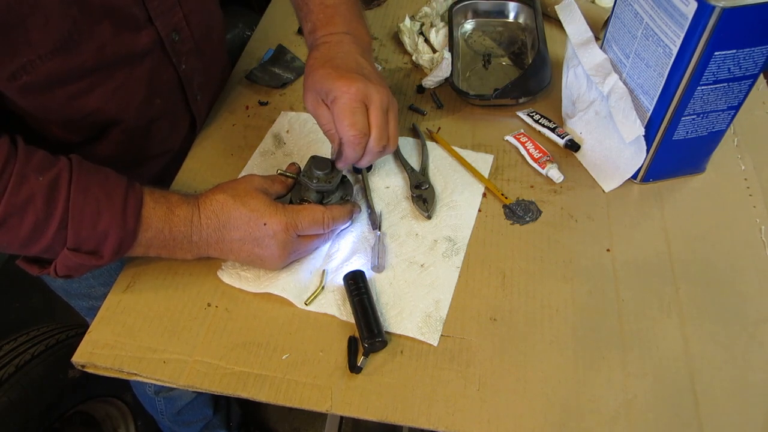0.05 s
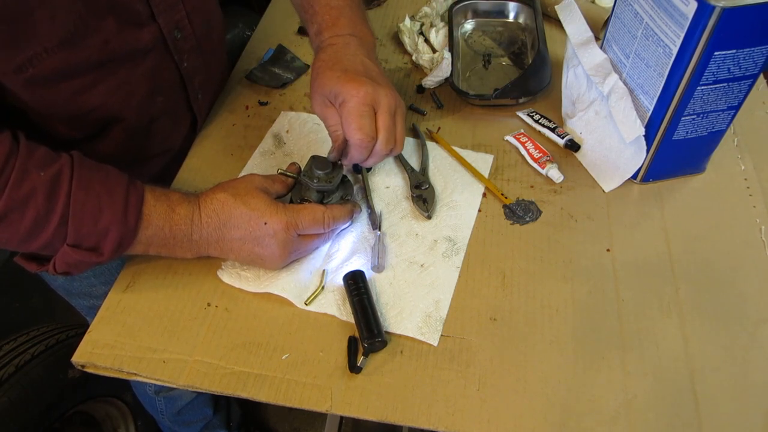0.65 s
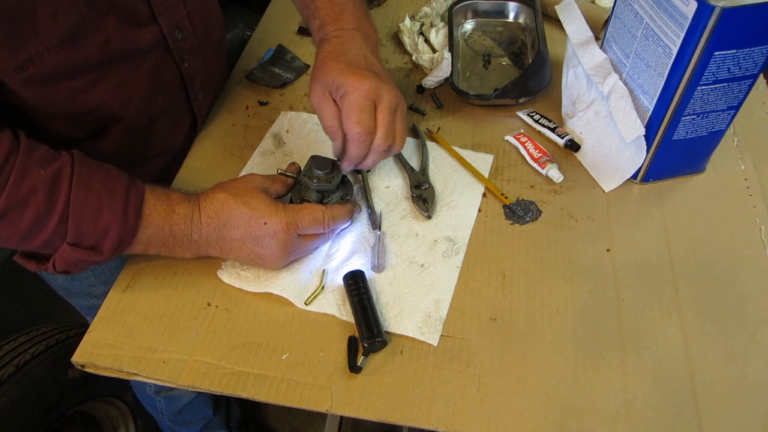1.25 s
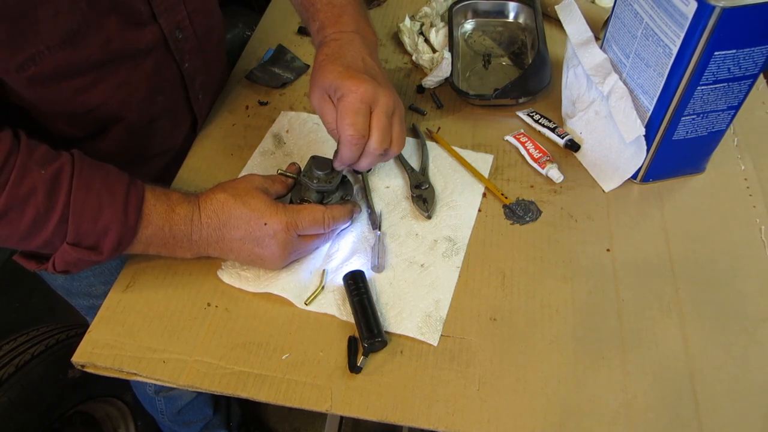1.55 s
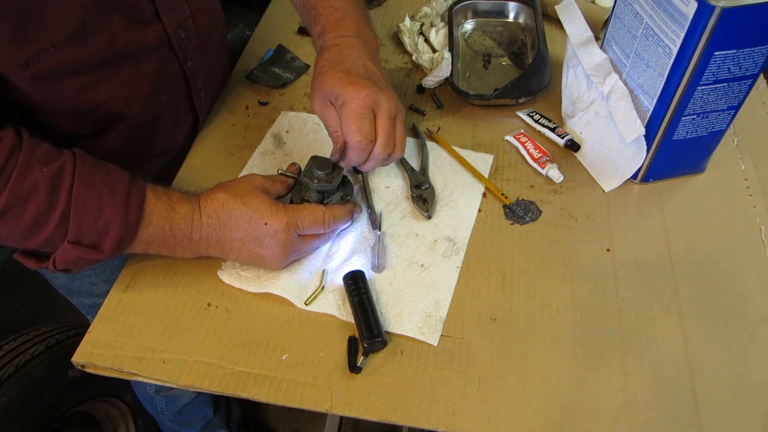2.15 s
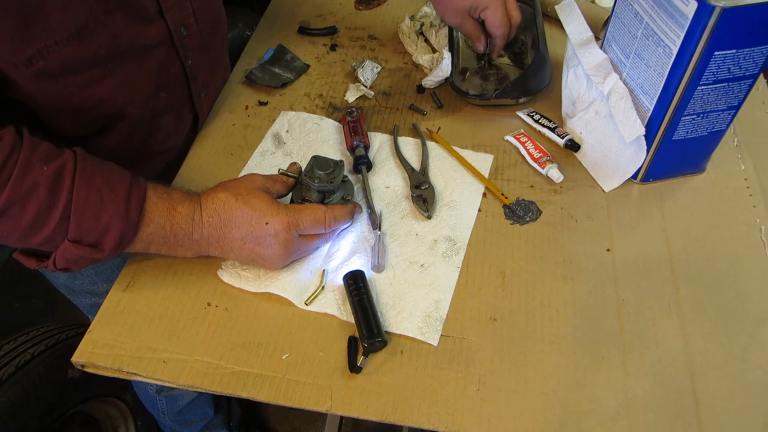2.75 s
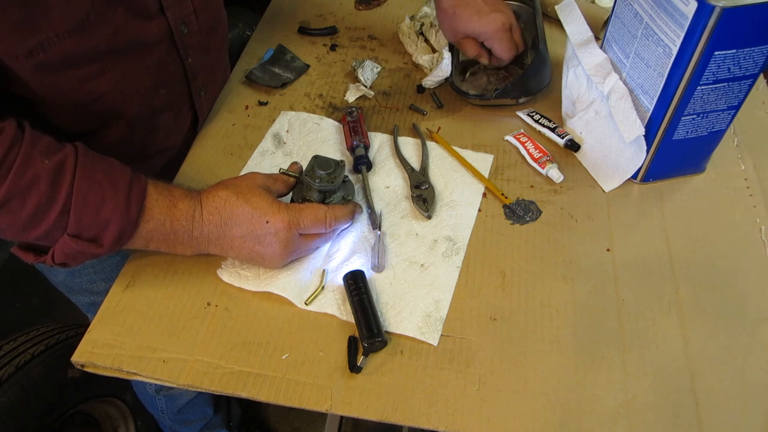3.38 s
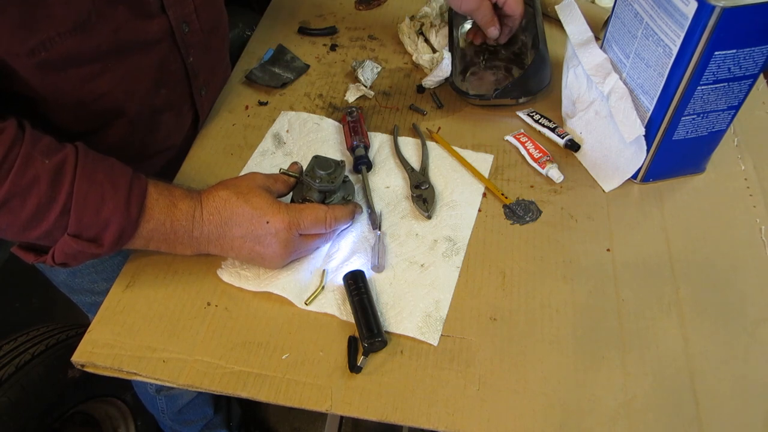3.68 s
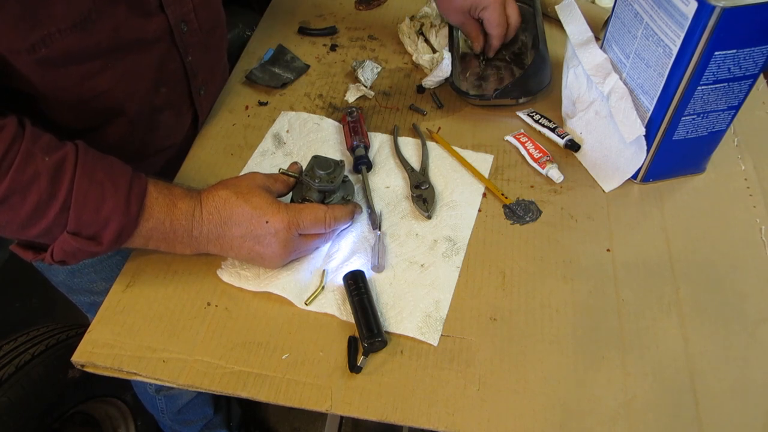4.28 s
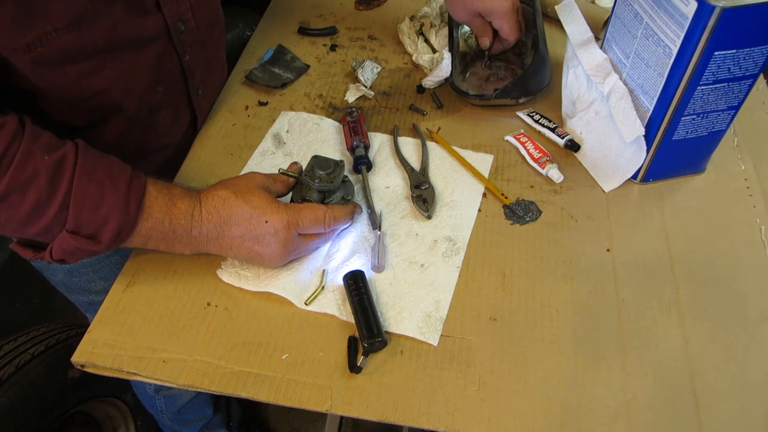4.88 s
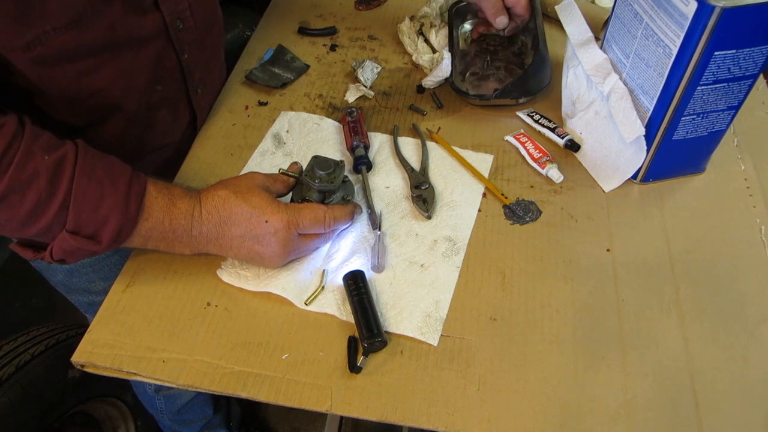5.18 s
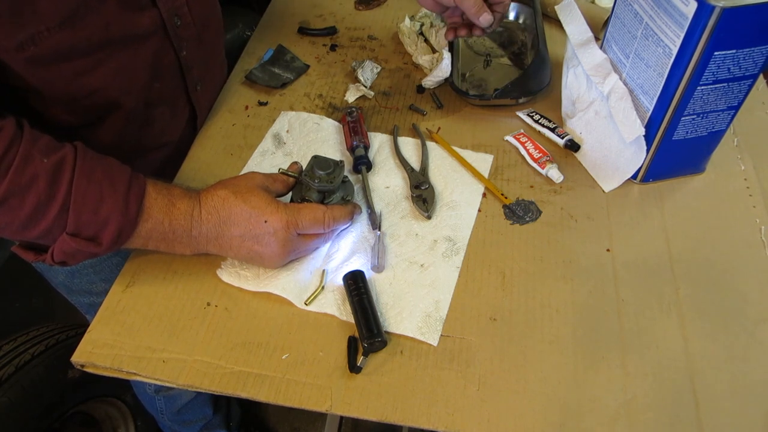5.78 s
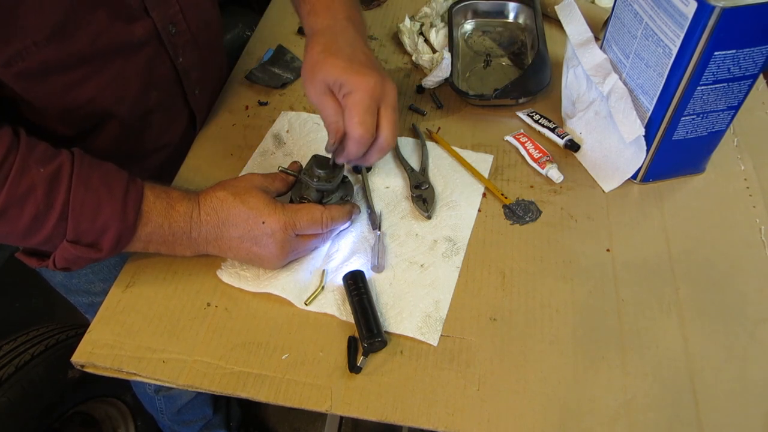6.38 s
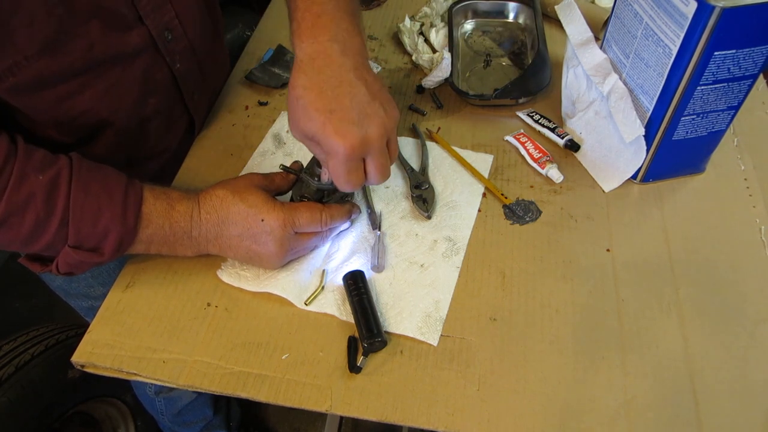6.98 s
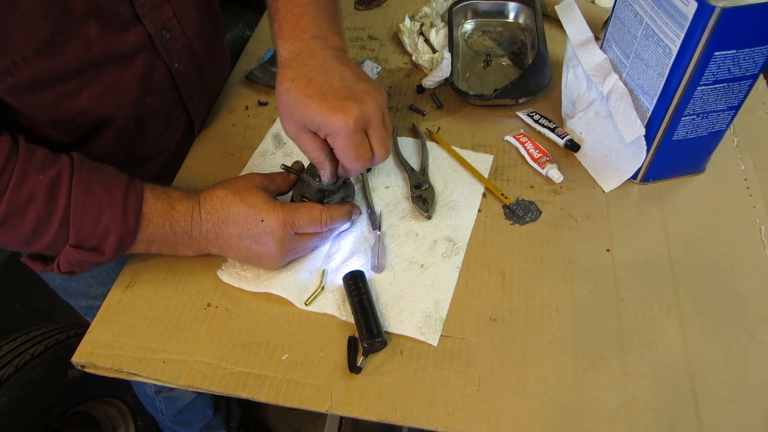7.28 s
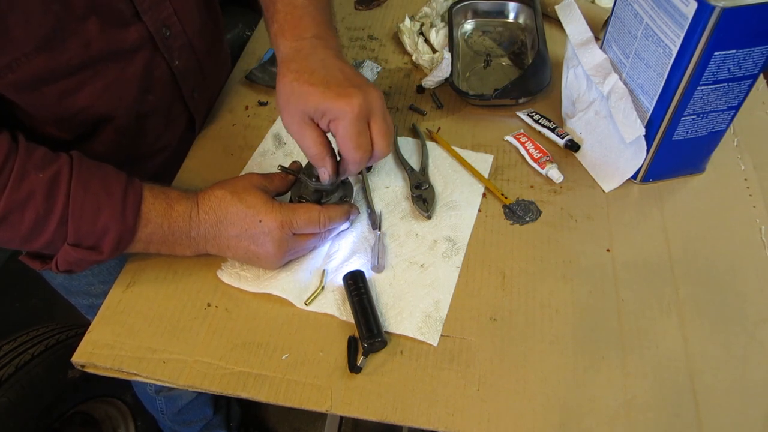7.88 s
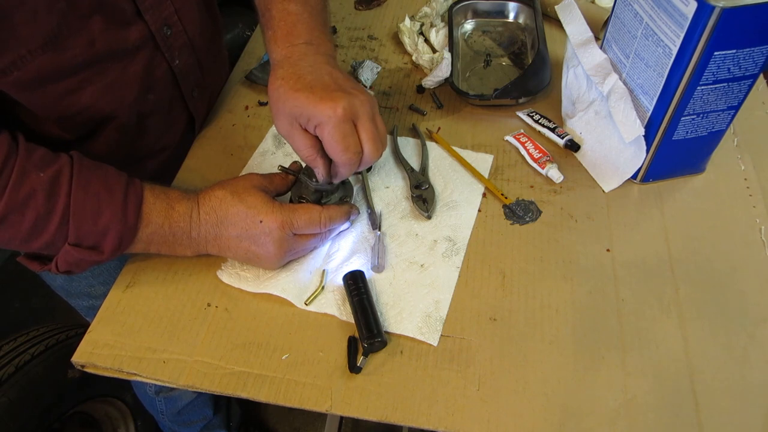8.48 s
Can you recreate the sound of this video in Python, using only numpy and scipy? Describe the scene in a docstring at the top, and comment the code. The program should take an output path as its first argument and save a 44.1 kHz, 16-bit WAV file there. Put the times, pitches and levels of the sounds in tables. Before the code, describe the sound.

In a workshop, birds chirp faintly outside over a soft rush of air. A screw ticks lightly against a metal part. Then a hand rummages in a small metal tray close by: parts slide and clink, with two very sharp clacks. The tipped tray drops back onto the bench with a brief ringing clatter, and the screw ticks against the metal part again.

```python
"""Birds chirp outside a workshop all the way through, over a soft rush of air. First a screw ticks against
a hand-held metal part. From about 3 s a hand rummages in a small tray: parts slide, clink and make the
tray ring, and after the two hardest clacks a limiter briefly turns everything down. At 5.5 s the tipped
tray drops back onto the bench and the parts fall after it. Near 7 s the fingers brush over the parts
once more and the screw ticks against the metal part again."""
import sys
import numpy as np
from scipy import signal
from scipy.fft import rfft, irfft
from scipy.io import wavfile

SR = 44100
rng = np.random.default_rng(int(sys.argv[2]) if len(sys.argv) > 2 else 0)


def unload_audio(sound):
    """Save the sound as a 16-bit wav file, at the path given as the first command line argument."""
    columns = np.transpose(np.atleast_2d(sound))
    # keep every value between -1 and 1, then stretch to whole-number steps
    steps = np.round(np.clip(columns, -1, 1) * 32767)
    wavfile.write(sys.argv[1], SR, steps.astype(np.int16))


N = 381024
TIME = np.arange(N) / SR
BLOW = TIME[:SR // 4]  # the quarter second that one blow lasts

# The tray's modes, the tones it rings with. Each row: pitch in Hz, level in dB, fade time in seconds.
TRAY_MODES = [(316, -9, 0.14), (393.5, 1, 0.088), (545, 2.5, 0.081), (678, 7, 0.12), (788, 4.5, 0.24),
              (897, 9, 0.058), (971, 6.5, 0.23), (1196, -3, 0.32), (1244, 4, 0.1), (1392, -5.5, 0.18),
              (1442, 6, 0.15), (1570, 3.5, 0.046), (1638, -1.5, 0.076), (1710, 11, 0.081),
              (1790, -5.5, 0.067), (1837, -3, 0.42), (1950, -11, 0.29), (2060, -4.5, 0.19), (2180, 0, 0.24),
              (2210, -11.5, .28), (2266, -4, 0.22), (2386, -7.5, 0.27), (2500, -1, 0.21), (2760, -3, 0.37),
              (2730, -9, .25), (2900, -17.5, .15), (3420, 3, 0.086), (3420, -11, .18)]


def from_db(db):
    return 10 ** (np.asarray(db) / 20)


def rms_one(x):
    """Scale a sound to an average strength (rms) of 1."""
    return x / np.sqrt(np.mean(x ** 2) + 1e-20)


def at_hz(points, hz):
    """Read between a table's rows, with octaves evenly spaced."""
    f, value = np.transpose(points)
    return np.interp(np.log(np.maximum(hz, 1)), np.log(f), value)


def dying(t, t60):
    """Fall by 60 dB in t60 seconds, the fade time."""
    return np.exp(-np.log(1000) * t / max(t60, 1e-3))


def add(track, s, sound):
    """Mix a sound in, starting at s seconds."""
    start = max(round(s * SR), 0)
    track[start:start + len(sound)] += sound[:N - start]


def keep_band(x, hz, kind, order=2):
    """Let the "low", "high" or in-between ("band") frequencies through."""
    return signal.sosfilt(signal.butter(order, hz, kind, fs=SR, output="sos"), x)


def noise(spectrum, size):
    """Noise with a given tone colour, at rms 1."""
    gain = from_db(at_hz(spectrum, np.fft.rfftfreq(size, 1 / SR)))
    return rms_one(irfft(rfft(rng.standard_normal(size)) * gain, size))


def ringing(modes, spread_db, detune=.007):
    """A blow rings each mode with its own strength; the changing load shifts the pitches a little."""
    hz, db, t60 = np.transpose(modes)
    hz = hz * (1 + detune * rng.standard_normal(len(modes)))
    gains = from_db(db + spread_db * rng.standard_normal(len(modes)))
    gains *= rng.choice([-1, 1], len(modes)) / np.sqrt(np.sum(gains ** 2) / 2)
    return sum(g * np.sin(2 * np.pi * f * BLOW) * dying(BLOW, life) for g, f, life in zip(gains, hz, t60))


def background(mid_db=-53, side_db=-46, whine_hz=15735, whine_db=-70):
    """A wide rush of room air, microphone hiss and a thin electronic whine."""
    # Noise alike in both ears (mid) and opposite (side). Each row: frequency in Hz, relative level in dB.
    mid_colour = [(15, -33.5), (25, 4.5), (49, 0.5), (123, -0.5), (200, -5.5), (363, -3.5), (439, -7),
                  (962, 0), (2000, -9), (2350, -9), (6560, -17), (7110, -17), (7920, -11), (14800, -21),
                  (16000, -19)]
    side_colour = [(15, -18.5), (25, -3.5), (127, -3.5), (363, -2), (516, -4.5), (659, -1.5), (887, -1),
                   (2760, -10), (7110, -18.5), (8140, -48.5), (14400, -63.5), (16000, -18)]
    whine = from_db(whine_db) * np.sin(2 * np.pi * whine_hz * TIME)
    mid = from_db(mid_db) * noise(mid_colour, N) + whine
    return mid + from_db(side_db) * noise(side_colour, N) * [[1], [-1]]


def workshop(x, direct_db, echo_db, side_db, stretch):
    """The room adds a wash of echoes that builds quickly and dies soonest in the treble."""
    # The echoes. Each row: frequency in Hz, fade time in seconds before stretching.
    fades = [(200, 0.35), (1000, 0.4), (3000, 0.38), (6000, 0.33), (10000, 0.29), (16000, 0.16)]
    t = TIME[:SR]
    edges = np.geomspace(100, 18000, 10)
    tail = np.zeros((2, SR))
    for low, high in zip(edges, edges[1:]):
        band = keep_band(rng.standard_normal((2, SR)), [low, high], "band", order=3)
        tail += band * dying(t, stretch * at_hz(fades, np.sqrt(low * high)))
    tail *= np.clip((t - .003) / 0.0014, 0, 1)  # the first echo comes after 3 ms
    mid, side = (from_db(echo_db) * signal.fftconvolve(x, h / np.linalg.norm(h))[:N] for h in tail)
    width = from_db(side_db) * keep_band(side, 11000, "low", order=1) * [[1], [-1]]
    return from_db(direct_db) * x + mid + width


def birds(full_rasp_hz=520, flutter_hz=350, bend=1.6):
    """Nearly pure whistles that slide and level off; rasp shakes their pitch."""
    # The calls. Each row: start in seconds, kind, end pitch in Hz, level in dB.
    calls = [(.2, "slur", 2660, -59), (.487, "slur", 2640, -54.5), (.785, "pip", 3674, -55),
             (.92, "pip", 3560, -65), (.921, "chup", 2445, -57), (.99, "churr", 2100, -55),
             (1.2, "slur", 2670, -53), (1.272, "slur", 3430, -63), (1.479, "slur", 2636, -53),
             (2.048, "pip", 3700, -55), (2.058, "churr", 2215, -54.5), (2.296, "slur", 2640, -56.5),
             (2.605, "slur", 2746, -58.5), (2.77, "chup", 2400, -57), (2.9, "slur", 2710, -57),
             (3.215, "whistle", 2820, -58), (3.541, "whistle", 2660, -54), (3.74, "chup", 2400, -54.5),
             (3.835, "whistle", 2775, -54), (3.951, "whistle", 2450, -46.5), (4.205, "whistle", 2690, -55),
             (4.444, "chup", 2370, -53.5), (4.579, "whistle", 2640, -52), (5.39, "whistle", 2686, -55),
             (6.15, "pip", 3690, -56.5), (6.34, "whistle", 2720, -59), (6.585, "pip", 2504, -54),
             (7.29, "whistle", 2690, -58), (7.442, "squawk", 3170, -51), (7.727, "pip", 3667, -54),
             (8.515, "whistle", 2704, -56)]
    # Each kind of call: length in seconds, start pitch divided by end pitch, rasp from 0 to 1.
    shapes = {"slur": (.115, 1.33, .23), "whistle": (.1, 1.11, .11), "pip": (.1, 1.04, .11),
              "churr": (0.0596, 1.15, 0.28), "chup": (.068, .92, .33), "squawk": (0.057, .93, 0.86)}
    out = np.zeros(N)
    for s, kind, end_hz, level_db in calls:
        length, fall, rasp = shapes[kind]
        u = np.linspace(0, 1, int(length * SR))  # progress through the call
        shake = rms_one(keep_band(rng.standard_normal(len(u)), flutter_hz, "low"))
        slide_hz = end_hz * (1 + (fall - 1) * (1 - u) ** bend)
        hz = slide_hz + rasp * full_rasp_hz * shake * (1 - u / 2)
        whistle = np.sin(2 * np.pi * np.cumsum(hz) / SR) * np.sqrt(u * (1 - u))
        add(out, s, from_db(level_db) * rms_one(whistle))
    return out


def brushing():
    """Skin sliding on metal gives a soft hiss that swells and fades."""
    # Finger strokes. Each row: middle in seconds, half length in seconds, level in dB.
    strokes = [(3.586, 0.27, -56.5), (7.078, 0.25, -64.5)]
    # The hiss. Each row: frequency in Hz, relative level in dB.
    skin_colour = [(1000, -28), (2500, -14.5), (4800, 2.5), (6500, -1), (8300, -7), (15000, -28)]
    swell = sum(from_db(db) * np.exp(-((TIME - s) / half) ** 2) for s, half, db in strokes)
    return noise(skin_colour, N) * swell


def click(t60, note_hz, treble_db, note_db=10, note_width=0.06, overtone=1.4, overtone_db=5.5):
    """Steel on steel: a short crack, boosted at the screw's note and one overtone."""
    # The crack. Each row: frequency in Hz, relative level in dB.
    steel_colour = [(100, -31.5), (900, -31.5), (1500, -15.5), (2600, -3), (4500, -3), (6200, -1),
                    (9000, -1.5), (11000, -2), (15000, -4), (17000, -27.5)]
    hz = np.maximum(np.fft.rfftfreq(len(BLOW), 1 / SR), 1)
    colour = at_hz(steel_colour, hz) + treble_db * at_hz([(3000, 0), (13000, 1)], hz)
    for centre, db in ((note_hz, note_db), (note_hz * overtone, overtone_db)):
        colour += db * np.exp(-.5 * (np.log(hz / centre) / note_width) ** 2)
    # the energy arrives scattered over the length of the contact
    scatter = np.angle(rfft(rng.standard_normal(len(BLOW)) * dying(BLOW, t60)))
    crack = irfft(from_db(colour) * np.exp(1j * scatter), len(BLOW)) * dying(BLOW, 4 * t60)
    return crack / np.abs(crack).max()


def ticks(ring_db=-14, click_db=-2):
    """The screw lightly touches the hand-held metal part, which rings only briefly."""
    # The touches. Each row: start in seconds, level in dB.
    touches = [(1.603, -43), (1.959, -42), (2.322, -42), (6.762, -50), (7.011, -39.5), (7.186, -44),
               (7.205, -45), (7.25, -21)]
    # The part's tones. Each row: pitch in Hz, level in dB, fade time in seconds.
    part_modes = [(868, 0, 0.071), (3090, -0.5, 0.062), (4780, -11, .025), (5780, 9, 0.023),
                  (6700, -12, 0.03), (7300, 2, .02), (9400, -15, .015), (10300, 4, .015),
                  (11840, -6, 0.016), (13350, -20, .012)]
    out = np.zeros(N)
    for s, level_db in touches:
        ring = from_db(ring_db) * ringing(part_modes, spread_db=2, detune=.015)
        tap = from_db(click_db) * click(t60=0.0069, note_hz=7700, treble_db=-2.5)
        add(out, s, from_db(level_db) * (ring + tap))
    return out


def upper_modes(lowest_hz=1100, weaker_db=-24, damping=0.43):
    """Light parts barely move the tray's low modes, and the hand inside shortens the ring."""
    return [(hz, db + weaker_db * (hz < lowest_hz), t60 * damping) for hz, db, t60 in TRAY_MODES]


def tray_buzz(t60):
    """Under the loose parts, the tray's crowded modes blur into a short buzz."""
    # The buzz. Each row: frequency in Hz, relative level in dB.
    buzz_colour = [(100, -26), (300, -9.5), (700, -1.5), (1300, 5), (2300, 4.5), (3300, -4), (4500, -14),
                   (8000, -18.5), (15000, -33)]
    return noise(buzz_colour, len(BLOW)) * dying(BLOW, t60)


def strikes():
    """List the strikes; the way a part hits shapes its click and how much the tray rings."""
    # Each row: start in seconds, kind, click level in dB, screw's note in Hz, treble change in dB.
    hits = [(2.915, "bump", -47.5, 3300, -10), (3.17, "bump", -49, 2300, -8),
            (3.249, "bump", -42, 5260, -2.5), (3.31, "clink", -16, 4240, -17),
            (3.3366, "clink", -13, 3470, -14.5), (3.3439, "clack", -8.5, 3300, -15),
            (3.4271, "clack", -16.5, 2550, -18.5), (3.482, "clack", -26.5, 5300, -4.5),
            (3.9415, "snap", 12.5, 6270, 11), (3.9423, "snap", 6.5, 2500, 1),
            (4.545, "clack", -37, 8500, -7), (4.582, "bump", -48, 2100, -3),
            (4.645, "clink", -24, 3770, -34.5), (4.656, "clink", -18, 8100, -10),
            (4.69, "clink", -28.5, 8000, -3.5), (4.7352, "clink", -20, 8300, -7.5),
            (4.8916, "clack", -24, 3500, -22), (4.9121, "clink", -19.5, 3500, -19.5),
            (4.919, "clink", -19, 8000, -12.5), (4.9446, "clink", -21.5, 5100, -15),
            (5.008, "clack", -25, 3200, -31), (5.03, "clack", -31.5, 3500, -15.5),
            (5.1046, "clack", -23, 7700, 2), (5.122, "bump", -29, 2600, -8),
            (5.1369, "snap", 16.5, 7840, -6), (5.138, "snap", 13.5, 8540, -7.5),
            (5.6353, "fall", 0, 2500, -0.5), (5.661, "fall", -6.5, 6000, -1.5),
            (5.669, "fall", -3, 5100, -2), (5.694, "fall", -0.5, 5350, 6.5)]
    # Each kind: click fade time in seconds, click's low edge in Hz, tray level against the click in dB.
    # bump: against the wall; clack: onto the floor; clink: screw on screw;
    # snap: a hard blow, one end and then the other; fall: parts coming down after the tray lands.
    contacts = {"bump": (.016, 1000, 2.9), "clack": (0.028, 1200, -8), "clink": (0.026, 870, -18),
                "snap": (.0105, 40, -35.5), "fall": (0.03, 340, -33)}
    for s, kind, click_db, note_hz, treble_db in hits:
        t60, lowest_hz, ring_db = contacts[kind]
        yield s, click_db, t60, lowest_hz, note_hz, treble_db, click_db + ring_db


def movement(rise_s=0.025, settle_s=0.17, jostle_db=-8.5, jostle_s=0.084):
    """How much the parts move: each push swells, holds and dies away, and each strike jostles them."""
    # Fingers pushing the parts. Each row: start in seconds, length in seconds, level in dB.
    pushes = [(2.885, 0.049, -54), (3.082, 0.26, -51.5), (3.289, .19, -41.5), (4.488, 0.15, -56),
              (4.703, 0.34, -46), (5.088, 0.077, -33)]
    out, t = np.zeros(N), TIME[:SR]
    for s, length, db in pushes:
        add(out, s, from_db(db) * np.minimum(t / rise_s, 1) * dying(np.maximum(t - length, 0), settle_s))
    for s, *_, tray_db in strikes():
        add(out, s, from_db(tray_db + jostle_db) * dying(BLOW, jostle_s))
    return out


def sliding(slips_per_s=260, spread_db=4.5, ring_db=4, floor_db=2.0):
    """Parts slide in many tiny slips; each one scratches and rings the tray and its floor."""
    # The scratch. Each row: frequency in Hz, relative level in dB.
    grit_colour = [(300, -34), (1000, -17), (1200, -8), (1700, 0), (2700, 0), (4000, -3), (5300, -7.5),
                   (6500, -15), (8200, -9), (15000, -30.5)]
    # The floor's one tone: pitch in Hz, level in dB, fade time in seconds.
    floor_mode = (1196, 0, .3)
    happens = rng.random(N) < slips_per_s / SR
    slips = happens * rng.choice([-1, 1], N) * from_db(spread_db * np.minimum(rng.exponential(1, N), 3))
    grit = signal.fftconvolve(slips, noise(grit_colour, len(BLOW)) * dying(BLOW, .014))[:N]
    tray = signal.fftconvolve(slips, ringing(upper_modes(), spread_db=1.5, detune=0))[:N]
    tray = keep_band(tray, 2500, "low", order=1)
    floor = signal.fftconvolve(slips, ringing([floor_mode], spread_db=0, detune=0))[:N]
    scrape = rms_one(grit) + from_db(ring_db) * rms_one(tray) + from_db(floor_db) * rms_one(floor)
    return movement() * rms_one(keep_band(scrape, 1100, "high", order=4))


def tray_drop(buzz_db=-5, modes_db=-2):
    """The whole tray lands and rocks: its low modes sound too, and the parts in it jump."""
    # Knocks on the bench. Each row: start in seconds, ring level in dB, click level in dB.
    knocks = [(5.5148, -8.5, -3), (5.563, -20, -19), (5.596, -32, -38)]
    out = np.zeros(N)
    for s, ring_db, click_db in knocks:
        tray = from_db(buzz_db) * tray_buzz(t60=0.17)
        tray += from_db(modes_db) * ringing(TRAY_MODES, spread_db=0)
        add(out, s, from_db(ring_db) * tray * (1 - dying(BLOW, 0.0013)))  # slightly softened start
        add(out, s, from_db(click_db) * click(t60=0.051, note_hz=7580, treble_db=-12))
    return keep_band(out, 149, "high", order=3)


def screw_ring(note_hz, t60=0.34):
    """A loose screw and its neighbours jingle on in seven close tones."""
    return ringing([(note_hz * ratio, 0, t60) for ratio in np.linspace(.9, 1.1, 7)], spread_db=2)


def clacks(screw_db=-34.5, buzz_db=1.5, modes_db=-3):
    """Each strike is a click, a thin ring of the screw and an answer from the tray."""
    out = np.zeros(N)
    for s, click_db, t60, lowest_hz, note_hz, treble_db, tray_db in strikes():
        free = min(t60 / .025, 1) ** 4  # a screw pinned by the fingers clicks short and hardly rings
        crack = keep_band(click(t60, note_hz, treble_db), lowest_hz, "high")
        screw = crack + from_db(screw_db) * free * screw_ring(note_hz)
        buzz = keep_band(tray_buzz(t60=0.075), 1300, "high", order=8)
        ring = keep_band(ringing(upper_modes(), spread_db=-2.5), 960, "high", order=5)
        tray = from_db(buzz_db) * buzz + from_db(modes_db) * ring
        add(out, s, from_db(click_db) * screw + from_db(tray_db) * tray)
    return out


def from_the_right(x, pan_db=0.68, lag_samples=0.11):
    """The tray stands a little to the right: the left microphone hears it softer and later."""
    delay = np.exp(-2j * np.pi * np.fft.rfftfreq(N) * lag_samples)
    late_left = irfft(rfft(x[0]) * delay, N)
    return np.array([from_db(-pan_db) * late_left, from_db(pan_db) * x[1]])


def scene():
    """Give each source its share of the room's echo and mix them in stereo."""
    rummage = clacks() + sliding() + brushing()
    light = workshop(rummage, direct_db=-0.5, echo_db=-9, side_db=-10, stretch=0.84)
    heavy = workshop(tray_drop(), direct_db=-2.5, echo_db=-11.5, side_db=-10.5, stretch=1.38)
    near = workshop(ticks(), direct_db=5.5, echo_db=-3.5, side_db=-9, stretch=0.86)
    outside = workshop(birds(), direct_db=-3.5, echo_db=-6, side_db=-9, stretch=1)
    return from_the_right(light + heavy) + near + outside + background()


def record(dry, threshold_db=-3.5, release_s=0.46, attack_s=0.00037, cutoff_hz=16100):
    """A limiter turns loud peaks down fast and recovers slowly; then clipping and a cut of the top."""
    over_db = np.maximum(20 * np.log10(np.abs(dry).max(axis=0) + 1e-9) - threshold_db, 0)
    fading = np.exp(-TIME / release_s)
    held_db = np.maximum.accumulate(over_db / fading) * fading  # each peak lingers, then lets go
    smoothing = np.exp(-1 / (attack_s * SR))
    duck_db = signal.lfilter([1 - smoothing], [1, -smoothing], held_db)
    limited = np.clip(dry * from_db(-duck_db), -1, 1)
    return signal.sosfilt(signal.ellip(14, .1, 70, cutoff_hz, fs=SR, output="sos"), limited)


dry = scene()
out = record(dry)
unload_audio(out)
```